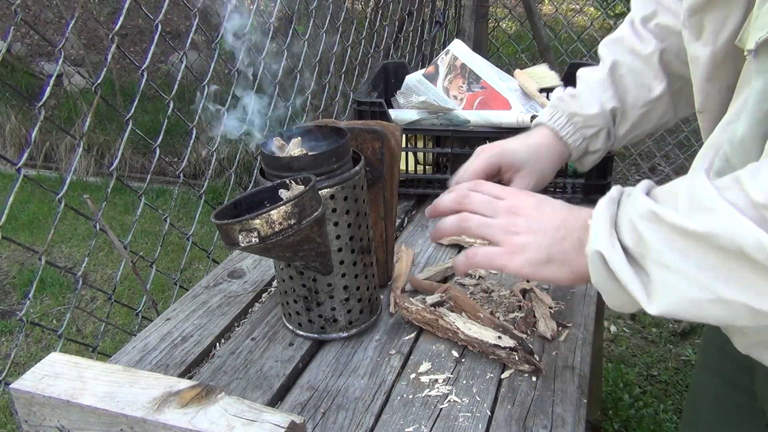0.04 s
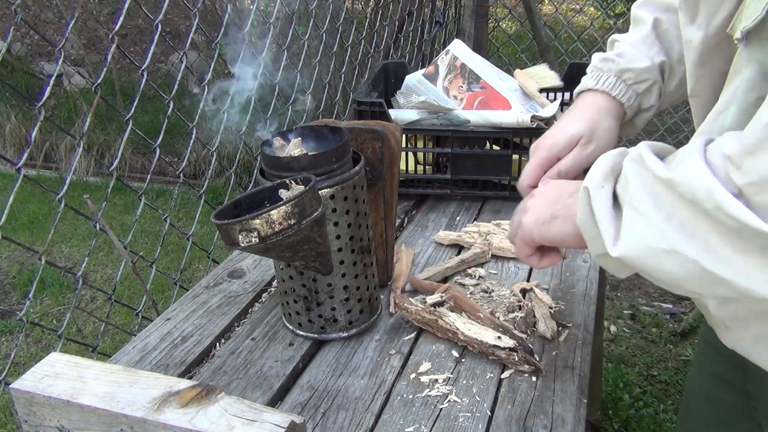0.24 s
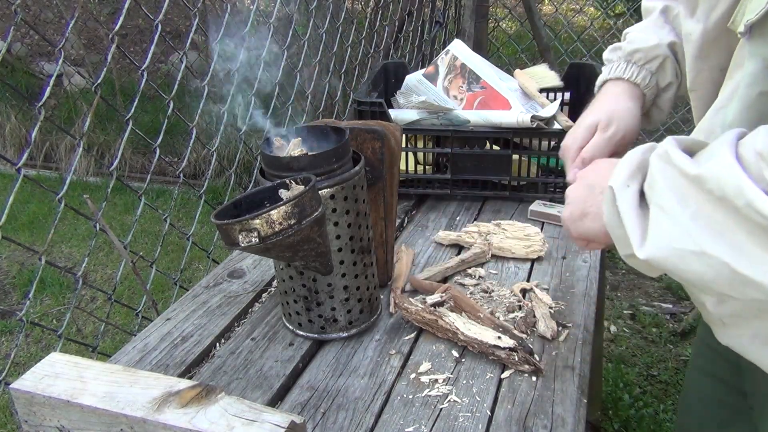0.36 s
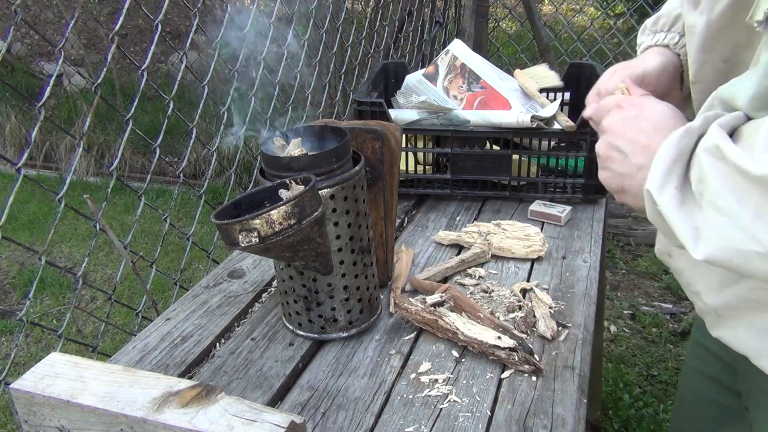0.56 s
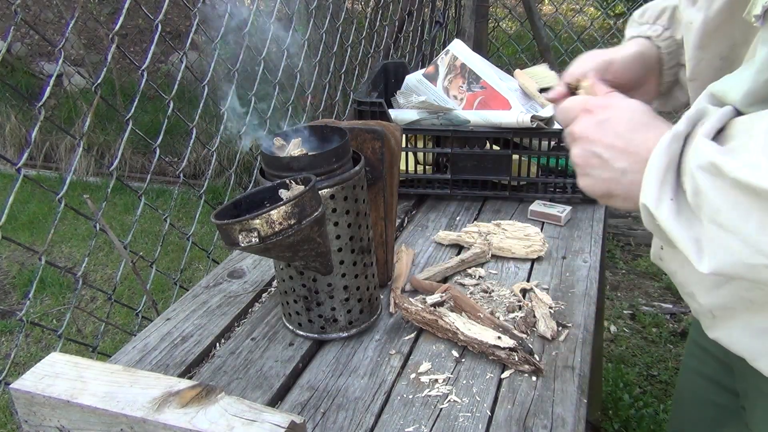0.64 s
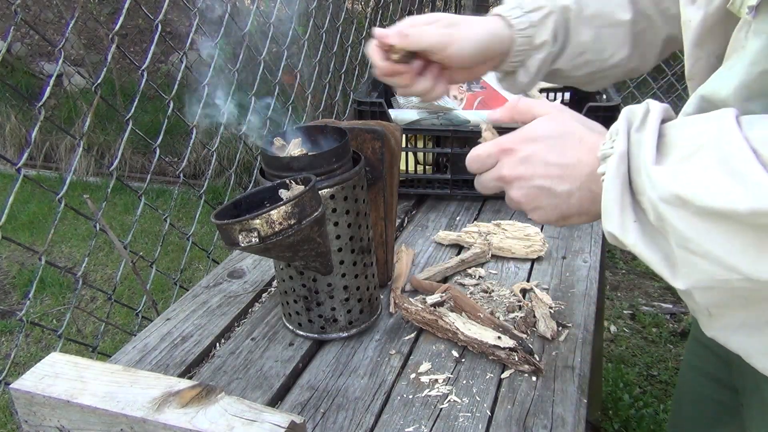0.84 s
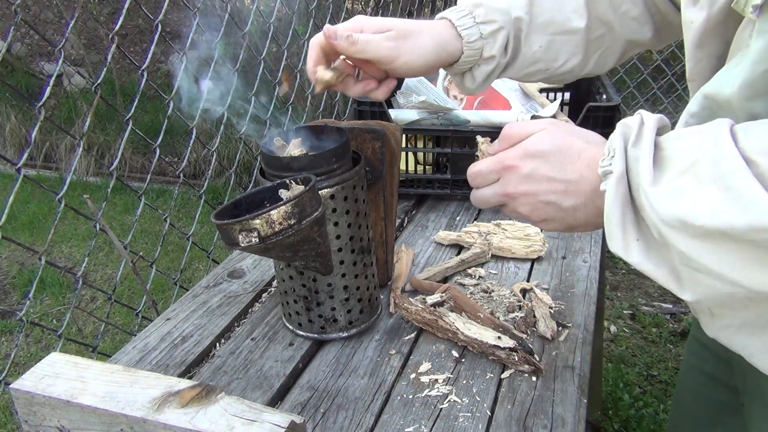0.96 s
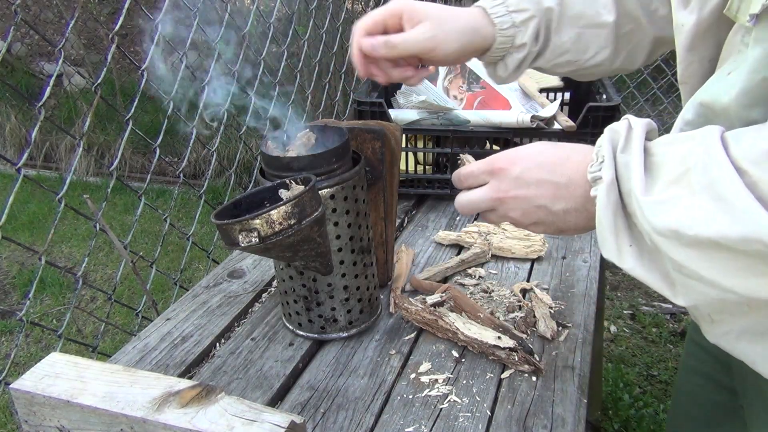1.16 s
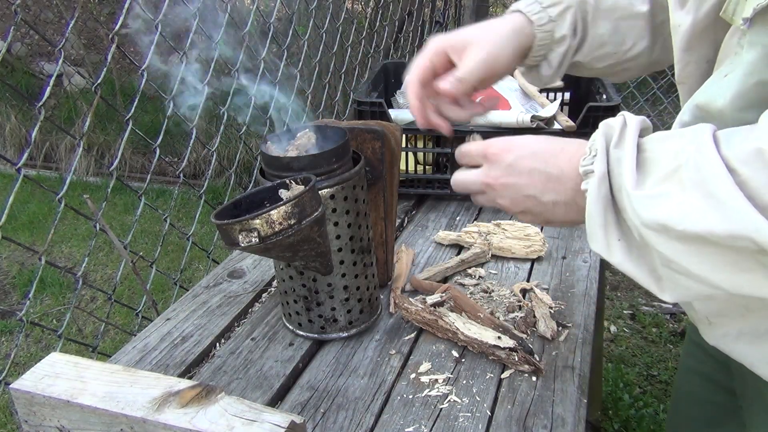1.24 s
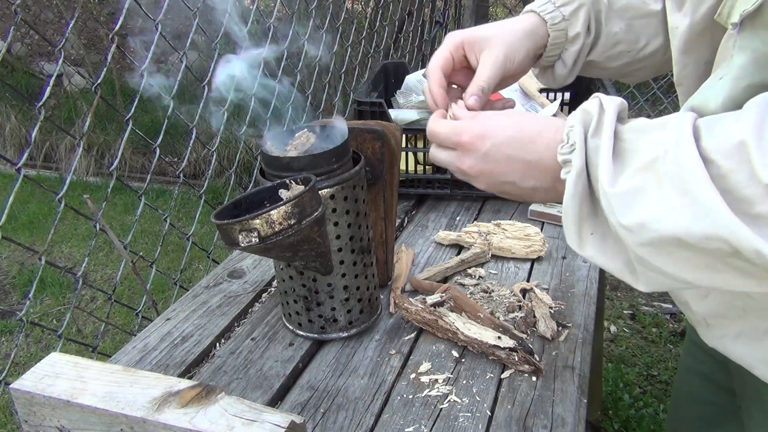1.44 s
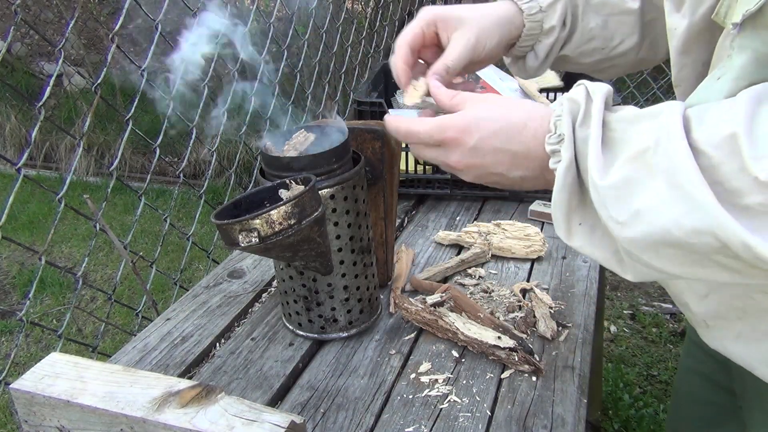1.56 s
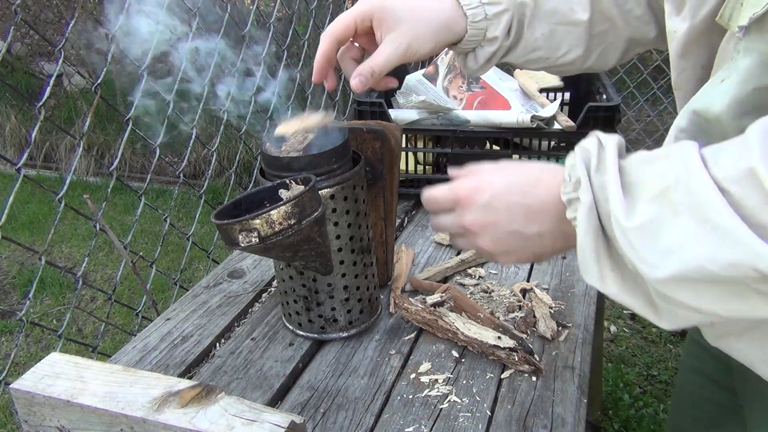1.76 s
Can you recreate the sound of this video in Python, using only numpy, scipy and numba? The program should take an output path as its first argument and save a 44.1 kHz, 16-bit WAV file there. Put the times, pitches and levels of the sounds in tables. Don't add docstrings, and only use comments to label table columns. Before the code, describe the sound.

A sharp brittle wood snap amid faint ticks, dry rustling and small scraps falling, distant traffic beneath

```python
import sys
import numpy as np
from scipy import signal
from scipy.fft import rfft, irfft
from scipy.io import wavfile
from scipy.ndimage import uniform_filter1d
from numba import njit

SR = 44100
rng = np.random.default_rng(int(sys.argv[2]) if len(sys.argv) > 2 else 0)


def output_pcm(signal):
    pcm = np.clip(np.atleast_2d(signal).T, -1, 1) * 32767
    wavfile.write(sys.argv[1], SR, np.round(pcm).astype(np.int16))


def invert_db(x):
    u = np.asarray(x, float) / 20
    return 10 ** u


N = 79380
LEFT_RIGHT = np.array([[1], [-1]])
GRAIN_DB = 2.8


def curve(table, col=1):
    table = np.array(table)
    return np.interp(np.arange(N) / SR, table[:, 0], table[:, col])


def unit(x):
    return x / np.sqrt(np.mean(x ** 2))


def colour(x, points, tilt_db=0.):
    hz = np.maximum(np.arange(4097) * SR / 8192, 10)
    points = np.array(points)
    db = np.interp(np.log(hz), np.log(points[:, 0]), points[:, 1])
    db = db + tilt_db * np.clip(np.log2(hz / 7500), -1.3, .5)
    ceps = irfft(db * np.log(10) / 20)
    ceps[1:4096] *= 2
    ceps[4097:] = 0
    h = irfft(np.exp(rfft(ceps)))
    return signal.fftconvolve(x, h / np.sqrt(np.sum(h ** 2)))[:len(x)]


def walk(rate):
    hold = int(SR / rate)
    steps = np.repeat(rng.standard_normal(N // hold + 1), hold)
    return 1.78 * uniform_filter1d(uniform_filter1d(steps, hold), hold)[:N]


def grit(count):
    strength = np.minimum(rng.exponential(size=count), 5)
    return rng.standard_normal(count) * invert_db(GRAIN_DB * strength)


def band(hz, width_hz):
    b, a = signal.iirpeak(hz, hz / width_hz, SR)
    return unit(signal.lfilter(b, a, rng.standard_normal(N)))


def pan(x, db):
    return x * invert_db(db / 2 * LEFT_RIGHT)


def cracks(rows, db, pan_db, tail_db):
    # frequency in Hz, level in dB.
    crack_tone = [(700, -49), (1500, -27), (3200, -21), (5500, -9.5), (6900, -3), (7900, -2.3),
                  (10000, -12.5), (16000, -39)]
    fibre_spread_db, fibre_share = 1.5, .6
    rise_share, tail_t60_s, scatter_side_db = .15, 0.053, -18
    out = np.zeros((2, N + 8192))
    t = np.arange(6000) / SR
    for start, peak_db, tilt_db, ms in rows:
        chance = rng.random(len(t))
        strength = rng.exponential(size=len(t))
        sign, echo, scatter = rng.standard_normal((3, len(t)))
        age = t * 1000 / ms
        shape = (1 - np.exp(-(age + 0.076) / rise_share)) * np.exp(-age ** 2)
        parting = 1 / (1 + np.exp((chance - fibre_share) / 0.011))
        fibres = np.sign(sign) * invert_db(fibre_spread_db * strength) * parting
        burst = colour(fibres * shape, crack_tone, tilt_db)
        tail = colour(echo, crack_tone, tilt_db) * invert_db(-60 * t / tail_t60_s)
        burst = burst / np.abs(burst).max() + invert_db(tail_db) * tail
        reflections = unit(scatter[:12]) / np.sqrt(12)
        side = invert_db(scatter_side_db) * np.convolve(burst, reflections)[:len(t)]
        first = int(start * SR)
        out[:, first:first + len(t)] += invert_db(peak_db + db) * (burst + side * LEFT_RIGHT)
    return pan(out[:, :N], pan_db)


def snaps():
    # start in seconds, peak in dB, tilt in dB per octave, burst length in ms.
    breaks = [(.4672, -29, 1, 1.5), (.4855, -23, -1, 1), (.5022, -31, 3, 1.2), (.51, -32, 0, 1.2),
              (.5137, -20, 2, 1), (.5177, -11, -3, .5), (.5189, 0, -4, .75), (.5202, -13, -4, 2.6),
              (.5301, -3, 1, 1.3), (.5345, -21, 1, 1.8), (.5571, -19, 1, 1.3), (.5603, -22, 1, 5),
              (.568, -17, 3, 2), (.5722, -24, 2, 1.8), (.5826, -9, 4, .9), (.5861, -3.5, 14, 1.7),
              (.5885, -17, 5, 2.2)]
    return cracks(breaks, db=2.5, pan_db=-0.8, tail_db=-20)


def ticks():
    # start in seconds, peak in dB, tilt in dB per octave, burst length in ms.
    small_cracks = [(.0178, -38, 0, .8), (.0235, -34.5, 6, 2.5), (.0535, -44, 22, 1.2),
                    (.0616, -24, 23, 0.25), (.0704, -21, 24, 0.41), (.0915, -37, 3, 0.86),
                    (.138, -48, 4, 0.58), (.1662, -36, -5, .8), (.2119, -29.5, 5, 3.3),
                    (.2995, -27.5, -2, 1.8), (.3598, -41, -14, 1.3), (.8372, -35, 11.5, 2.7),
                    (.85, -39, -5, 5.9), (.9348, -39, -15, 1.7), (.998, -42.5, 10, 3.7),
                    (1.1312, -45, 1.5, 2.5), (1.1472, -31, 1, 1.9), (1.1553, -39, 8, 0.6),
                    (1.1615, -39.5, -4, 2.5), (1.1938, -39, -30, 0.47), (1.2282, -34, 8, 2),
                    (1.2443, -34.5, -9, 2.2), (1.3713, -42, -10, 2.5), (1.403, -42, 4, 6),
                    (1.5055, -46, 0.1, 2.2), (1.603, -44, 4, 8), (1.621, -42, 1, 3.7)]
    return cracks(small_cracks, db=2.5, pan_db=-0.7, tail_db=-24)


def rustle():
    # time in seconds, level in dB, tilt in dB per octave.
    rub_early = [(0, -54.5, 14), (.05, -56, 0), (.15, -57.5, 0), (.165, -50, -3), (.186, -50.5, 1),
                 (.195, -41.5, -2), (.235, -41.5, 3.7), (.25, -38.5, -2.5), (.285, -38, -1),
                 (.325, -39, -1), (.395, -34, -1), (.425, -38.5, 1.5), (.445, -47.5, -2), (.6, -43, -11),
                 (.62, -51, -12)]
    # time in seconds, level in dB, tilt in dB per octave.
    rub_late = [(.82, -51.5, 0.1), (.85, -50.5, 0.066), (.92, -53, 0.12), (1.1, -61.5, 0.077),
                (1.14, -47, 4.1), (1.18, -55.5, 0.1), (1.215, -48.5, 0.1), (1.26, -55, 0.1),
                (1.31, -50.5, 0.1), (1.36, -51.5, 0.087), (1.45, -45.5, 1.7), (1.508, -40, 7.5),
                (1.545, -47, 5), (1.557, -58, 1.5), (1.61, -53.5, 1.1), (1.65, -58, 0.1), (1.8, -62.5, 0.1)]
    # frequency in Hz, level in dB.
    rustle_tone = [(1000, -29.5), (2400, -18.5), (3500, -9), (4750, -10), (5800, -4), (8000, 2.3),
                   (10500, -13), (16000, -20)]
    # frequency in Hz, level in dB.
    side_port = [(4000, -25), (5500, 0), (8000, 0), (10000, -25)]
    flicker_db, side_db = 1.4, -20
    rub = list(rub_early) + list(rub_late)
    cloth_share = np.clip(.5 + curve(rub, col=2) / 12, 0, 1)

    def grains():
        return unit(grit(N) * invert_db(flicker_db * walk(rate=190.0)))

    def rubbing():
        crumbs = colour(grains(), rustle_tone, -6) * np.sqrt(1 - cloth_share)
        cloth = colour(grains(), rustle_tone, 6) * np.sqrt(cloth_share)
        return (crumbs + cloth) * invert_db(curve(rub))

    mid = rubbing()
    side = colour(rubbing(), side_port)
    return mid + invert_db(side_db) * side * LEFT_RIGHT


def scuffs():
    # start in seconds, level in dB, centre in Hz, length in ms.
    scrapes = [(.002, -49, 7500, 1.1), (.008, -42, 7460, 3.7), (0.061, -37, 4300, 1.8),
               (0.0706, -35.5, 4500, 1.85), (.088, -40, 8000, 1.6), (.115, -47, 7500, 5.4),
               (.148, -47, 8000, 2), (.155, -41.5, 7650, 6), (.162, -37, 7400, 4.6), (.172, -43, 7500, 8),
               (.203, -46, 7800, 4), (0.242, -37.5, 8440, 8.4), (.248, -38, 7400, 25),
               (.2995, -31, 5440, 7.7), (.308, -33.5, 5730, 7), (0.304, -36.5, 8250, 27),
               (0.338, -41.5, 3630, 15), (0.3593, -33, 6800, 3), (.372, -44, 3640, 9.8),
               (.385, -41, 6760, 4.3), (0.386, -47, 4000, 5.4), (.385, -47.5, 2020, 36),
               (.404, -45, 6200, 5), (.425, -43, 8000, 4), (.445, -39, 3940, 2), (.5185, -32, 1830, 2.2),
               (0.5193, -22.5, 4700, 5.6), (.538, -33, 5800, 16), (.837, -45, 3540, 4.2),
               (0.844, -49, 2730, 9.4), (1.148, -37, 7900, 3.8), (1.207, -55, 8200, 5),
               (1.216, -49, 7060, 5), (1.244, -42.5, 7660, 7), (1.161, -43, 5400, 7),
               (1.17, -42.5, 850, 12), (1.137, -45, 500, 7.7), (1.193, -42, 7540, 3),
               (1.374, -46, 7300, 18), (1.4038, -37.5, 7300, 7.7), (1.4045, -43.5, 4660, 6.7),
               (1.451, -45.5, 7650, 11), (1.459, -50, 4540, 5.5), (1.473, -44, 7300, 8),
               (1.484, -39, 7700, 9.2), (1.489, -47, 5640, 43), (1.503, -37.5, 7550, 16),
               (1.578, -47, 8300, 3.3)]
    q, rise_ms = 6, .6
    out = np.zeros(N + 4000)
    t_ms = np.arange(4000) * 1000 / SR
    for start, db, hz, ms in scrapes:
        b, a = signal.iirpeak(hz, q / 2, SR)
        ringing = signal.lfilter(b, a, signal.lfilter(b, a, grit(len(t_ms))))
        shape = (1 - np.exp(-t_ms / rise_ms)) * np.exp(-(t_ms / ms) ** 2)
        scrape = shape * ringing
        level = invert_db(db) * np.sqrt(np.sum(shape ** 2) / np.sum(scrape ** 2))
        first = int(start * SR)
        out[first:first + len(t_ms)] += level * scrape
    return out[:N]


def can():
    # frequency in Hz, level in dB, t60 in seconds.
    tin_modes = [(250, -4.5, 0.098), (325, -5, 0.11), (500, -9, 0.033), (812, -4, 0.079), (910, -5, .08),
                 (1040, -7, 0.05), (1448, -5, 0.32), (1780, -4.5, 0.06), (2126, -12, 0.19),
                 (2708, -5, 0.083), (5040, -1.5, 0.12), (5400, 3, .025), (5800, -6, 0.08)]
    # start in seconds, level in dB, contact in ms.
    knocks = [
        (1.14, -47.5, 0.79),
        (1.148, -42, 0.084),
        (1.1621, -38.5, 0.094),
        (1.172, -42.5, 0.71),
        (1.194, -43, 0.46),
    ]
    # frequency in Hz, level in dB.
    thud_tone = [(120, -17), (260, -6), (550, -2), (1000, -2), (2000, -10), (3200, -29)]
    thud_db, thud_t60_s, longest_t60_s = -1, .07, .3
    out = np.zeros(N + 16000)
    t = np.arange(16000) / SR
    for start, db, contact_ms in knocks:
        mix = rng.standard_normal(len(tin_modes))
        rise = 1 - np.exp(-t * 1000 / contact_ms)
        thud = rng.standard_normal(len(t)) * invert_db(-60 * t / thud_t60_s)
        ring = invert_db(thud_db) * colour(thud, thud_tone)
        for (hz, mode_db, t60), m in zip(tin_modes, mix):
            soft = 1 / (1 + (hz * contact_ms / 1000) ** 2)
            decay = invert_db(mode_db + 2 * m - 60 * t / min(t60, longest_t60_s))
            ring += decay * soft * np.sin(2 * np.pi * hz * t + 3 * m)
        first = int(start * SR)
        out[first:first + len(t)] += invert_db(db) * rise * ring
    return pan(out[:N], -1.2)


def knocks_and_chips():
    # start in seconds, level in dB, frequency in Hz, t60 in seconds.
    rings = [
        (.032, -43, 185, .07),
        (.1662, -35, 3800, .007),
        (.84, -46, 2700, .03),
        (1.194, -39, 3100, .015),
        (1.4045, -39, 4600, .025),
        (1.203, -47, 830, .08),
        (1.233, -49, 550, .06),
        (1.138, -41, 520, .04),
        (1.147, -36, 5500, .025),
        (1.2445, -49, 3000, .02),
    ]
    out = np.zeros(N)
    for start, db, hz, t60 in rings:
        t = np.maximum(np.arange(N) / SR - start, 0)
        out += invert_db(db - 60 * t / t60) * np.sin(2 * np.pi * hz * t)
    return out


def town():
    # frequency in Hz, level in dB.
    wash_tone = [(20, 5), (100, -8), (500, -6), (1100, -7), (1600, -10), (2500, -17.5), (7500, -24),
                 (16000, -29)]
    # frequency in Hz, level in dB.
    wash_side = [(60, -2.5), (200, -16), (500, -12.5), (1200, -4), (2400, -68), (4400, -25), (7500, -8),
                 (11000, -37)]
    # time in seconds, level in dB.
    car_level = [(0, -50), (.1, -57.5), (.6, -56), (1.8, -62)]
    # time in seconds, level in dB.
    hum_level = [(0.0, -55), (0.294, -65), (0.324, -57.5), (0.5, -62.5), (1.748, -58.5), (1.8, -67)]
    side_hz, side_db = np.array(wash_side).T
    side_tone = [(hz, db + np.interp(np.log(hz), np.log(side_hz), side_db)) for hz, db in wash_tone]
    noise = rng.standard_normal((2, N))
    mid = colour(noise[0], wash_tone)
    lean = colour(0.16 * noise[0] + 0.76 * noise[1], side_tone)
    wash = invert_db(-51 + 0.42 * walk(rate=3.2)) * (mid + invert_db(-7.5) * lean * LEFT_RIGHT)
    tyre_band = signal.butter(3, [815, 935], "band", fs=SR, output="sos")
    tyres = unit(signal.sosfilt(tyre_band, rng.standard_normal(N)))
    tyres = tyres * invert_db(-55.5 + 1.6 * walk(rate=12.4))
    car = invert_db(curve(car_level)) * band(hz=1167, width_hz=390)
    hum = invert_db(curve(hum_level)) * band(hz=75.8, width_hz=17.4)
    return wash + pan(car, -4.5) + pan(tyres, -2.5) + pan(hum, 13.0)


def scene():
    breaking = snaps() + ticks()
    handling = rustle() + scuffs()
    falling = can() + knocks_and_chips()
    return breaking + handling + falling + town()


@njit
def follow(x, attack, release):
    e, out = 0., np.empty(len(x))
    for i in range(len(x)):
        e += (x[i] - e) * (attack if x[i] > e else release)
        out[i] = e
    return out


def roll_off(x):
    return signal.sosfilt(signal.butter(12, 16660, fs=SR, output="sos"), x)


def record(dry):
    top_db, ratio, attack_s, release_s = -32, 1.8, .002, .025
    level = follow(np.abs(dry).max(axis=0), 1 / (attack_s * SR), 1 / (release_s * SR))
    gain = np.minimum(1, invert_db(top_db) / (level + 1e-9)) ** (1 - 1 / ratio)
    rumble_cut = signal.butter(2, 60, "high", fs=SR, output="sos")
    treble_cut = signal.ellip(8, .2, 45, 15720, fs=SR, output="sos")
    mix = signal.sosfilt(np.vstack([rumble_cut, treble_cut]), dry * gain)
    return roll_off(mix)


dry = scene()
out = record(dry)
output_pcm(out)
```